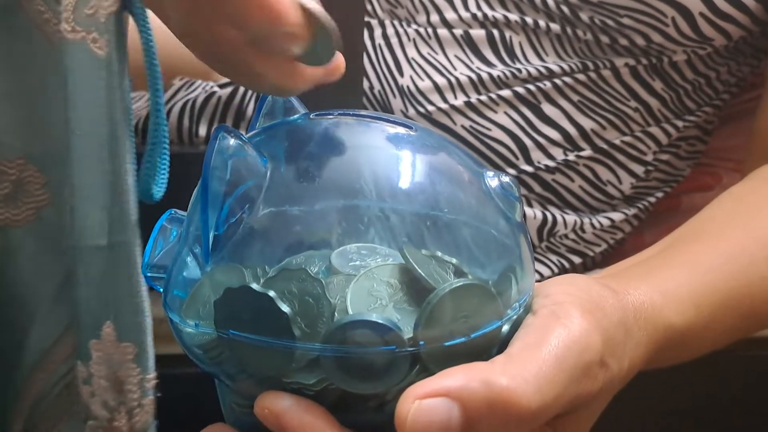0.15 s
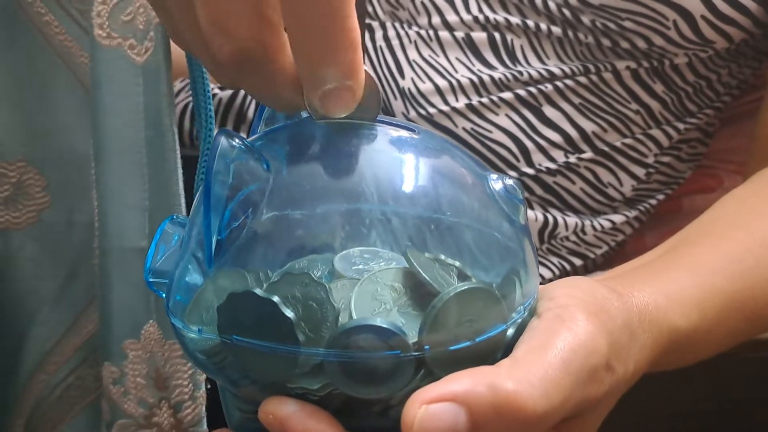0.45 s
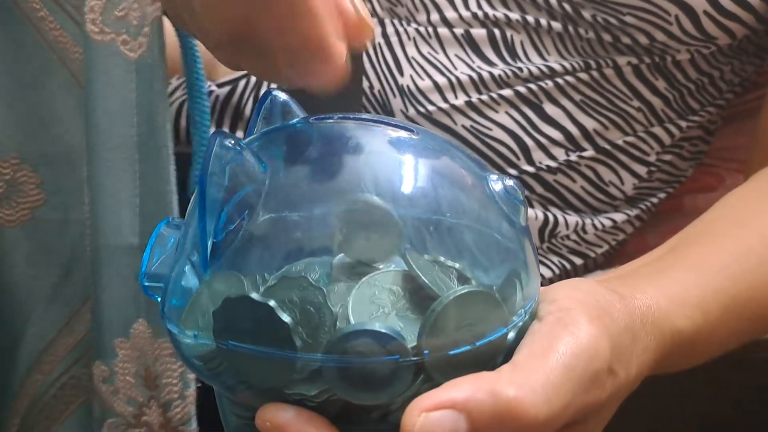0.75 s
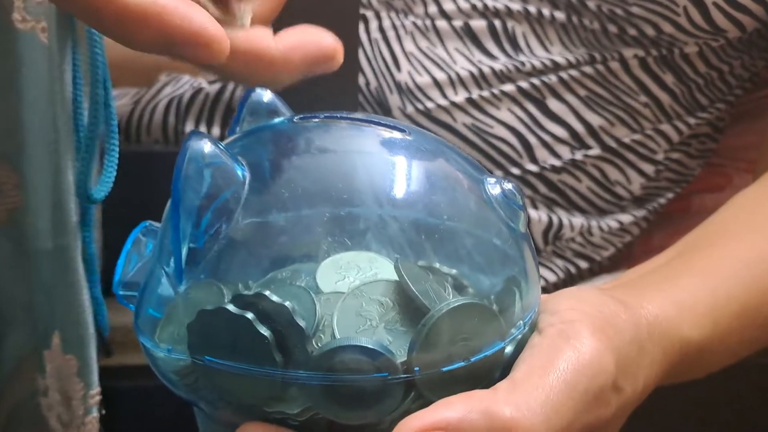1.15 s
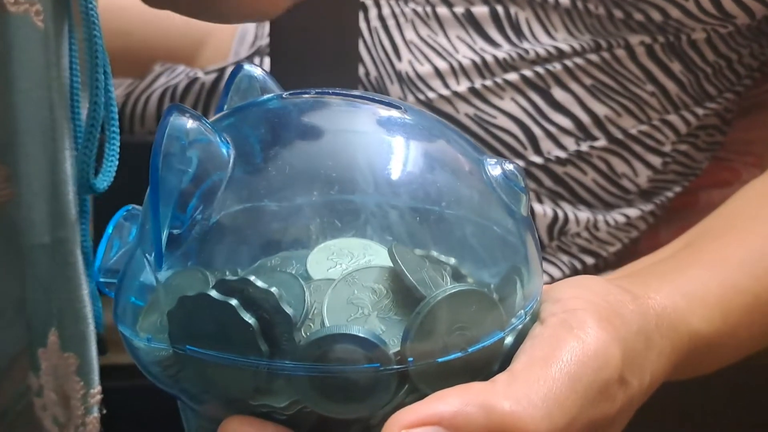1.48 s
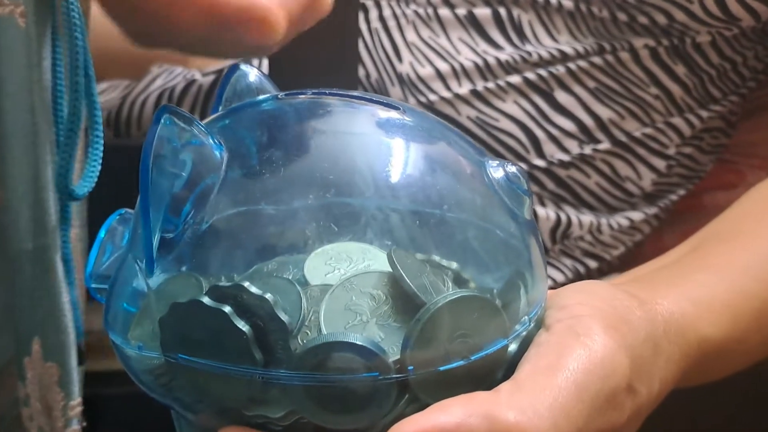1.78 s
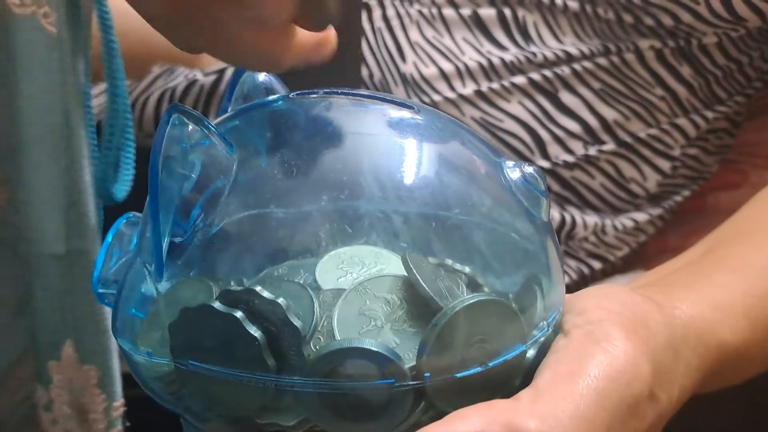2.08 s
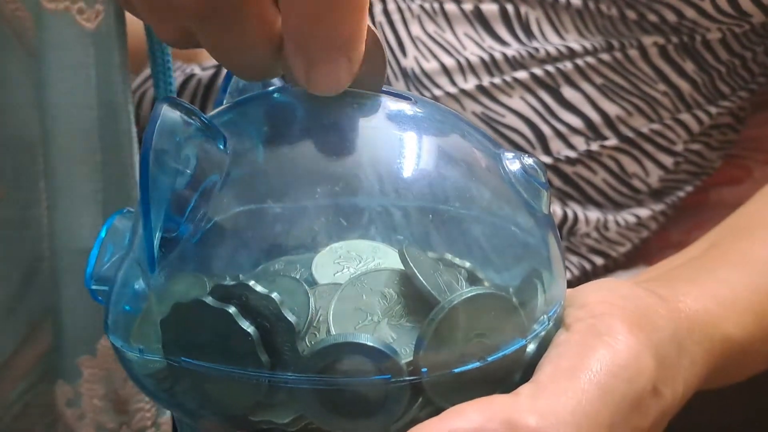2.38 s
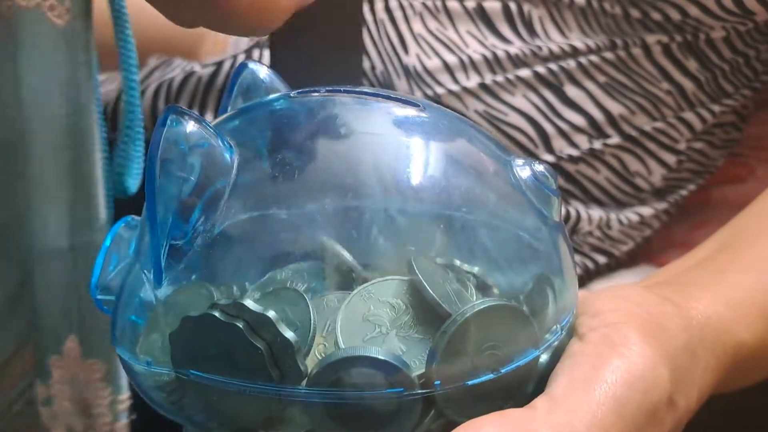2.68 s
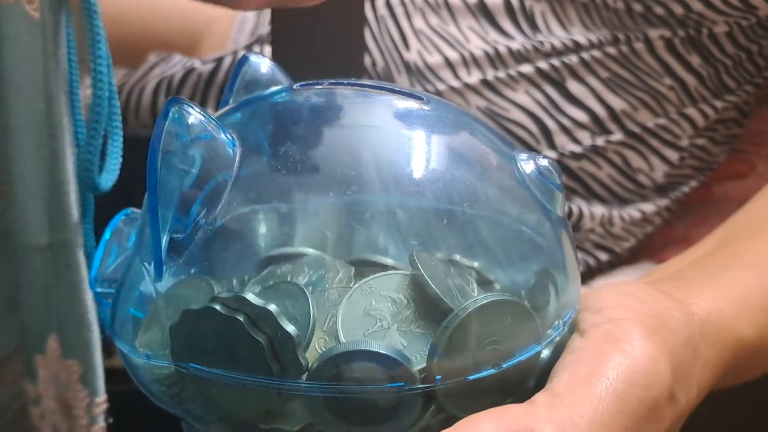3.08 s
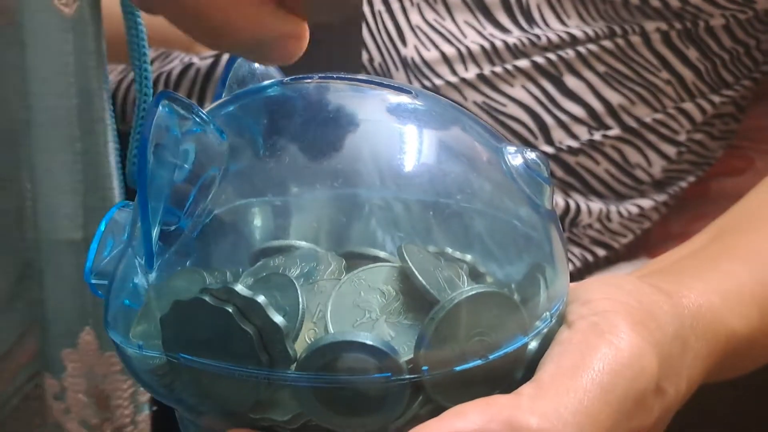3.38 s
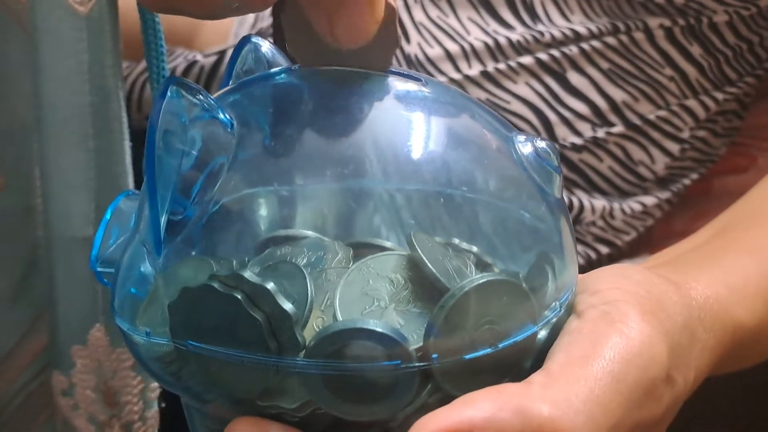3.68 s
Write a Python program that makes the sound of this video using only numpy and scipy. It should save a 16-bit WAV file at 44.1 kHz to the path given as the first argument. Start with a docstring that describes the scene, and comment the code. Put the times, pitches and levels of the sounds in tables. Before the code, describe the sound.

Close up in a small quiet room, a coin lands sharply on loose coins in a plastic container, fingers shuffle more coins with light clinks, then another knocks the slot and rattles down; the left side is brighter.

```python
"""In a quiet room with a low hum, coins are fed through the slot of a hollow plastic bank held in the hands.
Each coin scrapes the slot, lands on the pile, bounces and slides; between drops coins clink in the fingers.
Blows and rubs are random touches that excite ringing modes; free coins add single dying tones.
The left microphone port faces the coins; the right one is shadowed and hears them duller.
Feedback delays make the room, shaped noise makes its air, wavering hum and low rumble."""
import sys
import numpy as np
from scipy import signal
from scipy.fft import rfft, irfft, next_fast_len
from scipy.io import wavfile

SR = 44100
rng = np.random.default_rng(int(sys.argv[2]) if len(sys.argv) > 2 else 0)


def materialize(psi):
    """Save the field psi as 16-bit PCM at rate SR to the path in sys.argv[1].

    A 1-D psi becomes a single channel; in a 2-D psi each row is a channel.
    """
    bounded = np.clip(np.atleast_2d(psi).T, -1, 1)
    quanta = np.round(bounded * 32767).astype(np.int16)
    wavfile.write(sys.argv[1], SR, quanta)


def volts_from_decibels(level):
    """Turn decibel levels (scalar or array-like) into linear amplitude factors."""
    exponent = np.asarray(level, float) / 20
    return 10 ** exponent


N = 169785  # samples

# modes of the plastic shell, the coins in the pile, the slot edge and the coin rims: [f/Hz, level/dB]
SHELL_MODES = [(300, -10), (420, -7), (560, 0.5), (700, 7.5), (870, -2), (1100, 1), (1300, 9), (1600, -3.5)]
PILE_MODES = [(1900, -11.5), (2150, -3.5), (2430, 2), (2700, -5.5), (3000, 2), (3310, 3), (3750, -5.5),
              (4200, -4), (4700, 3), (5200, 4.5), (5800, 4), (6400, 3.5), (7000, -0.5)]
EDGE_MODES = [(2300, -20.5), (2600, 0.5), (3310, 1), (4300, -23), (5200, -7), (5900, -25.5)]
RIM_MODES = [(7700, -4), (8500, 0), (9300, 2.5), (10100, 1), (10900, 0.5), (11700, 0.5), (12500, -1.5),
             (13400, -2.5), (14400, -3), (15300, -0.5)]
# each body: modes, cycles of ringing until 60 dB down, likeness of the two ports (1 = same)
SHELL_BODY = (SHELL_MODES, 8, 0.82)
PILE_BODY = (PILE_MODES, 18, 0.54)
EDGE_BODY = (EDGE_MODES, 55, 0.54)
RIM_BODY = (RIM_MODES, 13, 0.54)
# a coin strikes the pile, shell and rim levels relative to the blow, chatter to its contact:
# [t/s, level/dB, favoured f/Hz, shell level/dB, rim level/dB, chatter level/dB, chatter t60/s]
PILE_STRIKES = [(0.8226, -17.5, 3360, -17, -8, -10, 0.15), (0.8807, -21.5, 2720, -7.5, -12, -17, 0.14),
                (0.9133, -13.5, 3440, -22.5, -17, -1, 0.035), (0.9206, -38, 2610, -18, -21.5, -17.5, 0.088),
                (0.9738, -22, 3250, -28, -14, -18, 0.11), (1.0305, -31, 5130, -15, -7, -16, 0.088),
                (1.065, -31, 3480, -43, 1, 2, 0.086), (1.1438, -24, 3800, -16.5, -18, -9, 0.15),
                (2.6733, -17, 3480, -19.5, -10, 1, 0.14), (2.7018, -16.5, 5330, -14.5, -14, -5, 0.11),
                (2.7412, -14, 3500, -30.5, -7.5, -10.5, 0.046), (2.7589, -28, 3320, -26, -10.5, -15.5, 0.1),
                (2.7794, -24, 3280, -19, -9, -14, 0.11), (2.7951, -5.5, 2300, -19, -18.5, -17.5, 0.07),
                (2.8616, -30, 3790, -17, -8, -10, 0.14), (2.8789, -22.5, 3200, -17.5, -13, -14.5, 0.072),
                (2.8924, -32, 3360, -22, -23, -17.5, 0.068), (2.917, -43, 3710, 1.5, -0.5, -30, 0.15),
                (2.9435, -22, 3070, -13, -9.5, -8.5, 0.072), (2.9481, -24.5, 3540, -22, -12, -3, 0.21),
                (2.9713, -18.5, 3290, -13.5, -6, -35, 0.1), (3.054, -24.5, 4340, -8.5, -39, -23, 0.15),
                (3.0769, -15, 2800, -21.5, -15.5, -23.5, 0.1), (3.0916, -29.5, 3370, -5, -7, -18, 0.1),
                (3.1142, -22, 4500, -26.5, -44, -16.5, 0.073)]


def coin_drops():
    """A falling coin excites pile, shell, slot edge and rims, then chatters as it settles."""
    s, db, pitch_hz, thud_db, treble_db, chatter_db, chatter_t60 = np.transpose(PILE_STRIKES)
    parts = [(SHELL_BODY, db + thud_db - 5.0), (PILE_BODY, db - 7),
             (EDGE_BODY, db - 24.5), (RIM_BODY, db + treble_db + 0.5)]
    return blows(s, pitch_hz, parts, chatter_db, chatter_t60, contact_s=0.0021)


# strokes of coins sliding over the pile, before the layer trim: [t/s, level/dB]
PILE_STROKES = [
    [(0.825, -31), (0.847, -47.5), (0.873, -58), (0.876, -46)],
    [(0.885, -27.5), (0.893, -41), (0.903, -43), (0.913, -33), (0.951, -53.5), (0.968, -58)],
    [(0.98, -45), (1.018, -63), (1.032, -48.5), (1.048, -54), (1.06, -47)],
    [(1.07, -48), (1.074, -48.5), (1.124, -41), (1.136, -47), (1.144, -35.5), (1.192, -67), (1.2, -61)],
    [(2.674, -35), (2.698, -34.5), (2.704, -29.5), (2.73, -33.5), (2.738, -35.5)],
    [(2.746, -32), (2.776, -40.5), (2.79, -36), (2.792, -27.5)],
    [(2.802, -27.5), (2.804, -31.5), (2.846, -51), (2.896, -41.5), (2.908, -47), (2.94, -42.5)],
    [(2.955, -47), (2.965, -39), (2.975, -30), (2.985, -43), (3.039, -45.5), (3.071, -54), (3.074, -35)],
    [(3.082, -33), (3.106, -41), (3.116, -37), (3.126, -56), (3.164, -76), (3.19, -60)],
]


def pile_slides():
    """A coin sliding over others makes dense small touches, mostly into the coin modes."""
    parts = [(SHELL_BODY, -16), (PILE_BODY, 0), (EDGE_BODY, -14), (RIM_BODY, -3)]
    return volts_from_decibels(-3.5) * rub(PILE_STROKES, parts)


# a free coin rings until stopped: [t/s, f/Hz, level/dB, t60/s, ringing time/s]
FREE_COINS = [(.881, 13230, -33, .3, .034), (.881, 13410, -41, .25, .14), (1.031, 13400, -39, .25, .075),
              (1.065, 8620, -45, .3, .077), (2.702, 9500, -43, .15, .04), (2.705, 6970, -44, .1, .025),
              (2.797, 9453, -42, .35, .065), (2.797, 9552, -42, .45, .22), (2.742, 3305, -36, .12, .033),
              (2.17, 8600, -54, .2, .09)]


def free_coin_rings():
    """Free coins keep single tones after the blow until the next touch stops them."""
    t = np.arange(N) / SR
    out = np.zeros((2, N))
    for s, hz, db, t60, length_s in FREE_COINS:
        stopped = np.clip((s + length_s - t) / 0.0055, 0, 1)  # fades over the last 5.5 ms
        decay = volts_from_decibels(db - 60 * np.maximum(t - s, 0) / t60)
        tone = np.sin(2 * np.pi * (hz * t + rng.random((2, 1))))  # own phase at each port
        out += (t > s) * stopped * decay * tone
    return out


# a coin touches the slot, shell and rim levels relative to the blow, chatter to its contact:
# [t/s, level/dB, favoured f/Hz, shell level/dB, rim level/dB, chatter level/dB, chatter t60/s]
SLOT_TOUCHES = [(0.4234, -51.5, 2480, -23, -12, 12, 0.26), (0.4474, -49, 3330, -6, -8, -18, 0.27),
                (0.525, -59, 2570, -11, -17, -7, 0.11), (0.648, -50, 2620, -22, -35.5, 4.5, 0.1),
                (0.7627, -46, 3320, -5.5, -28, -13.5, 0.15), (2.375, -53.5, 2610, -3, -50, -16, 0.1),
                (2.4421, -57, 2320, 2.5, -39, 0, 0.084), (2.5217, -29.5, 2580, -16, -50.5, -6.5, 0.074),
                (2.5385, -38, 2590, -13.5, -40, -12.5, 0.13), (2.5505, -35.5, 3330, -9, -60.5, -3.5, 0.1),
                (2.5906, -37, 2420, -9.5, -18.5, -7, 0.069), (2.6135, -30.5, 3290, -14, -27.5, -14.5, 0.25),
                (2.6283, -22.5, 3190, -23, -29.5, -13, 0.075), (3.8042, -58, 3350, -0.5, -20.5, -3, 0.25)]


def slot_touches():
    """A coin knocking the slot excites mainly its long-ringing edge and the shell."""
    s, db, pitch_hz, thud_db, treble_db, chatter_db, chatter_t60 = np.transpose(SLOT_TOUCHES)
    parts = [(SHELL_BODY, db + thud_db - 3), (EDGE_BODY, db - 4.5),
             (PILE_BODY, db - 17.5), (RIM_BODY, db + treble_db - 11.5)]
    return blows(s, pitch_hz, parts, chatter_db, chatter_t60, contact_s=0.0019)


# strokes of a coin sliding along the slot, before the layer trim: [t/s, level/dB]
SLOT_STROKES = [
    [(0.41, -83), (0.448, -63), (0.47, -72), (0.638, -91), (0.648, -66), (0.74, -88), (0.764, -56.5),
     (0.8, -79)],
    [(2.36, -93), (2.372, -74), (2.514, -87.5), (2.518, -57.5), (2.522, -46.5), (2.622, -62.5),
     (2.63, -35.5), (2.665, -64.5)],
]


def slot_scrapes():
    """A coin scraping through the slot makes dense touches, mostly into its edge."""
    parts = [(SHELL_BODY, -14), (EDGE_BODY, 0), (PILE_BODY, -12), (RIM_BODY, -22)]
    return volts_from_decibels(-3.5) * rub(SLOT_STROKES, parts)


def bank():
    """Everything that sounds through the plastic shell, with nothing below about 290 Hz."""
    sound = coin_drops() + slot_touches() + pile_slides() + free_coin_rings() + slot_scrapes()
    return signal.sosfilt(signal.butter(3, 290, "high", fs=SR, output="sos"), sound)


# modes of coins held in the hand: [f/Hz, level/dB]
HELD_MODES = [(2900, -16.5), (3300, -3.5), (3800, 0.5), (4300, 1), (4800, -1), (5300, -1), (6000, -4.5),
              (6800, -2.5)]
HELD_BODY = (HELD_MODES, 18, 0.54)
# coins clink in the fingers, rim level relative to the blow, chatter to its contact:
# [t/s, level/dB, favoured f/Hz, rim level/dB, chatter level/dB, chatter t60/s]
FINGER_CLINKS = [(0.0374, -70, 5000, 4, -6, 0.1), (0.132, -34, 5100, -7, -20.5, 0.13),
                 (0.2054, -51.5, 4470, -7, 4, 0.13), (0.2887, -64, 3210, -14, -8, 0.1),
                 (1.1006, -29.5, 4740, -12.5, -6.5, 0.15), (1.1234, -33.5, 3870, -23, -14, 0.18),
                 (1.2156, -28.5, 5360, -12, 16, 0.086), (1.2441, -30, 5060, -7, 3, 0.042),
                 (1.2755, -55, 5010, -1, -13, 0.1), (1.3021, -41, 5400, -6, -5, 0.08),
                 (1.4035, -47, 4370, -12, -10, 0.1), (1.4486, -32, 4110, -12, -16, 0.12),
                 (1.4554, -41.5, 4100, 1, -17, 0.1), (1.47, -29, 3700, -8, -5.5, 0.047),
                 (1.5115, -45.5, 4370, -4.5, -7, 0.084), (1.561, -49.5, 4460, 1, -10, 0.2),
                 (1.6056, -45, 3470, -3, -32, 0.13), (1.6108, -35.5, 4800, -5, 12, 0.12),
                 (1.6641, -49, 3330, -12, -19, 0.1), (1.7404, -52, 3100, -3, -7.5, 0.26),
                 (1.9124, -52.5, 3800, -5, -9, 0.15), (1.933, -47.5, 4000, -11.5, -12, 0.044),
                 (1.9538, -43.5, 3900, -9, -15, 0.16), (2.0566, -51.5, 3900, -9.5, 4, 0.3),
                 (2.0839, -32.5, 4270, -8.5, 8, 0.058), (2.135, -29, 3850, -1, -29, 0.24),
                 (2.1679, -38, 3340, -4.5, 10.5, 0.13), (3.1988, -30, 3960, -12, -2.5, 0.071)]


def finger_clinks():
    """Held coins knock together: shorter contacts into coin and rim modes, without the shell."""
    s, db, pitch_hz, treble_db, chatter_db, chatter_t60 = np.transpose(FINGER_CLINKS)
    parts = [(HELD_BODY, db - 6), (RIM_BODY, db + treble_db - 1.0)]
    return blows(s, pitch_hz, parts, chatter_db, chatter_t60, contact_s=0.00085)


# strokes of coins rubbing over each other in the hand, before the layer trim: [t/s, level/dB]
FINGER_STROKES = [
    [(0.0, -56), (0.01, -68.5), (0.032, -82), (0.04, -77), (0.066, -75.5), (0.11, -79)],
    [(0.12, -62), (0.132, -53.5), (0.148, -68), (0.19, -72), (0.212, -56), (0.246, -75), (0.38, -99)],
    [(1.07, -43), (1.082, -44.5), (1.104, -43), (1.11, -60), (1.122, -57), (1.136, -62), (1.14, -56)],
    [(1.19, -62), (1.2, -57), (1.22, -41), (1.244, -36.5), (1.292, -92), (1.298, -59), (1.39, -67)],
    [(1.39, -89), (1.404, -72), (1.432, -59.5), (1.446, -48), (1.476, -51), (1.492, -77), (1.55, -67)],
    [(1.55, -64), (1.564, -53), (1.596, -54.5), (1.612, -49.5), (1.694, -71), (1.752, -64.5), (1.8, -89)],
    [(1.89, -86), (1.91, -61.5), (1.936, -55), (1.948, -75), (1.954, -77), (1.972, -82), (2.04, -81)],
    [(2.05, -72), (2.058, -67), (2.07, -66), (2.084, -41), (2.11, -76), (2.13, -36)],
    [(2.14, -44), (2.144, -48), (2.174, -46), (2.222, -92), (2.27, -99.5)],
]


def finger_rubs():
    """Coins rubbing in the hand make dense touches into held-coin and rim modes."""
    return volts_from_decibels(-1.0) * rub(FINGER_STROKES, [(HELD_BODY, 0), (RIM_BODY, -3)])


def fingers():
    """Coins shifted in the hand above the slot, with nothing below about 2.7 kHz, a little softer on the right."""
    sound = (finger_clinks() + finger_rubs()) * volts_from_decibels([[0], [-2.0]])
    return signal.sosfilt(signal.butter(3, 2740, "high", fs=SR, output="sos"), sound)


BLOW_SIZE = 16384  # samples


def blows(s, pitch_hz, parts, chatter_db, chatter_t60, contact_s):
    """A short contact, then a dying chatter of small touches, into each (body, dB) part."""
    t = np.arange(BLOW_SIZE // 2) / SR
    touches = grains((len(s), len(t)), per_s=6000)
    t60 = np.clip(chatter_t60, .01, .4)[:, None]
    chatter = volts_from_decibels(chatter_db[:, None] - 60 * t / t60)
    force = touches * (np.exp(-t / contact_s) + chatter)
    force[:, 0] += 5.0  # the first hit
    spectra = rfft(force, BLOW_SIZE)
    sound = sum(volts_from_decibels(db)[:, None] * body(*thing, spectra, pitch_hz) for thing, db in parts)
    out = np.zeros((2, N + BLOW_SIZE))
    for k, start in enumerate((s * SR).astype(int)):
        out[:, start:start + BLOW_SIZE] += sound[:, k]
    return out[:, :N]


def body(modes, cycles, likeness, force, pitch_hz):
    """Each blow (a row of force spectra) favours modes near its pitch, a little differently at each port."""
    spread_pitch, spread_db = .02, 1.5  # pitch as a fraction
    favour_db, favour_octaves = 8.5, .3
    alike = np.clip(likeness, 0, 1)
    luck = rng.standard_normal((len(force), len(modes), 4))
    out = 0
    for k, (hz, db) in enumerate(modes):
        response = mode(hz * (1 + spread_pitch * luck[:, k, :1]), cycles / hz, BLOW_SIZE)
        port = alike + (1 - alike) * luck[:, k, 2:].T * [[.5], [1]]  # the right port varies more
        near_db = favour_db * np.exp(-(np.log2(hz / pitch_hz) / favour_octaves) ** 2)
        height = volts_from_decibels(db + near_db + spread_db * luck[:, k, 1]) * (-1) ** k
        out = out + (port * height)[:, :, None] * response
    sound = irfft(out * force, BLOW_SIZE)
    onset = sound[:1, :, :SR // 200]  # left port, first 5 ms, set to rms 1
    return sound / np.sqrt(np.mean(onset ** 2, axis=2, keepdims=True))


def rub(strokes, parts):
    """Dense touches, partly shared by the ports, drive all modes at the level of each stroke."""
    size, t = next_fast_len(N + SR // 4), np.arange(N) / SR
    level = sum(volts_from_decibels(np.interp(t, *np.transpose(rows), left=-200, right=-200)) for rows in strokes)
    shared, own = grains((N,), per_s=5000), grains((2, N), per_s=5000)
    response = 0
    for (modes, cycles, _), part_db in parts:
        for k, (hz, db) in enumerate(modes):
            response = response + volts_from_decibels(db + part_db) * mode(hz, cycles / hz, size) * (-1) ** k
    force = rfft((shared + own) * level, size)
    power = np.mean(np.abs(response) ** 2) * 2  # two sets of touches add up
    return irfft(force * response / np.sqrt(power), size)[:, :N]


def grains(shape, per_s):
    """Touches are random clicks of uneven size and sign; rms 1."""
    luck = rng.random(shape + (3,))
    clicks = luck[..., 0] < per_s / SR
    height = volts_from_decibels(-2.5 * np.log(luck[..., 1] + .01))
    return rms_one(clicks * height * np.sign(luck[..., 2] - .5))


def mode(hz, t60, size):
    """Frequency response of one ringing mode: a two-pole resonator whose impulse is a decaying sine."""
    z = np.exp(-2j * np.pi * np.arange(size // 2 + 1) / size)
    r, w = volts_from_decibels(-60 / (t60 * SR)), 2 * np.pi * np.minimum(hz, 17000) / SR
    return np.sin(w) * z / (1 - 2 * r * np.cos(w) * z + r * r * z * z)


def rms_one(x):
    """Scales a signal to rms 1."""
    return x / np.sqrt(np.mean(x ** 2) + 1e-20)


def at_hz(points, hz):
    """Reads a table on a log-frequency axis."""
    f, value = np.transpose(points)
    return np.interp(np.log(hz + 1e-9), np.log(f), value)


PORT_LAG_S = 0.0002  # right port behind left
# shadow over the right port: [f/Hz, level/dB]
RIGHT_SHADOW = [(300, -5.5), (1200, 0), (2400, -9.5), (4400, -4.5), (6500, -14.5), (8100, -20),
                (15000, -24)]


def space(x):
    """Eight feedback delays a side for the room, then the shadow and lag between the ports."""
    room_t60_s, room_db, room_cut_hz = 0.17, -16.5, 60000
    size = next_fast_len(N + SR)
    hz = np.arange(size // 2 + 1) * SR / size
    lags = rng.uniform(.006, 0.019, (2, 8, 1))  # s
    loop = volts_from_decibels(-60 * lags / room_t60_s) * np.exp(-2j * np.pi * hz * lags) / (1 + 1j * hz / room_cut_hz)
    echoes = loop / (1 - loop) * (-1) ** np.arange(8)[:, None]
    wet = echoes.sum(axis=1) * volts_from_decibels(room_db)
    right = np.exp(-2j * np.pi * hz * PORT_LAG_S) * volts_from_decibels(at_hz(RIGHT_SHADOW, hz))
    ports = np.array([np.ones(len(hz)), right])
    return irfft(rfft(x, size) * (1 + wet) * ports, size)[:, :N]


# colour of the room air, relative: [f/Hz, level/dB per Hz]
AIR_COLOUR = [(25, -27.5), (42, -5), (69, -18.5), (82, -2), (103, -5), (164, -11), (196, -13.5), (221, -23),
              (346, -17.5), (382, -21), (528, -26), (747, -29), (805, -32), (1110, -30), (2460, -45),
              (3650, -47), (5860, -61), (11200, -51.5), (15800, -62)]
# likeness of left and right air, negative values count as 0: [f/Hz, likeness]
AIR_LIKENESS = [(60, 0.94), (180, 0.92), (550, 0.77), (1650, -1.3), (4970, -0.03), (15000, -0.05)]
# left air over right: [f/Hz, level/dB]
AIR_BALANCE = [(60, 1), (110, 1), (200, -2.5), (380, 6), (700, -7), (1290, 2.5), (2380, -0.5), (4400, 3),
               (8120, 2.5), (15000, -7)]


def room_air():
    """Steady stereo noise: shared and opposed parts set how alike the ports are at each frequency."""
    hz = np.arange(N // 2 + 1) * SR / N
    mid, side = rfft(rng.standard_normal((2, N)))
    alike = np.clip(at_hz(AIR_LIKENESS, hz), 0, 1)
    lean = volts_from_decibels(at_hz(AIR_BALANCE, hz) * [[.5], [-.5]])
    lag = np.array([np.ones(len(hz)), np.exp(-2j * np.pi * hz * PORT_LAG_S)])
    stereo = np.sqrt(1 + alike) * mid + np.sqrt(1 - alike) * side * [[1], [-1]]
    return volts_from_decibels(-54) * rms_one(irfft(volts_from_decibels(at_hz(AIR_COLOUR, hz)) * lean * lag * stereo, N))


# wavering hum lines: [f/Hz, width/Hz, level/dB]
HUM_LINES = [(97.5, 6.9, -64.5), (309.9, 3.3, -75), (370.2, 24, -72), (758, 3.3, -76)]


def hum():
    """Narrow bands of noise, the same at both ports, are heard as wavering hum lines."""
    hz = np.arange(N // 2 + 1) * SR / N
    noise = rfft(rng.standard_normal(N))
    out = np.zeros(N)
    for f, width_hz, db in HUM_LINES:
        out += volts_from_decibels(db) * rms_one(irfft(noise / (1 + (2 * (hz - f) / width_hz) ** 2), N))
    return out


# course of the low rumble: [t/s, level/dB]
RUMBLE_LEVEL = [(0.0, -50.5), (0.96, -49.5), (1.34, -59), (1.85, -51.5), (2.23, -74), (2.59, -56),
                (3.4, -86), (3.43, -70), (3.83, -67), (3.85, -75)]


def low_rumble():
    """Noise in a narrow band, its own swells slightly evened out, follows a level curve."""
    centre_hz, width_hz, steadiness = 48, 7, 0.2
    hz = np.arange(N // 2 + 1) * SR / N
    noise = rfft(rng.standard_normal(N))
    band = signal.hilbert(irfft(noise / (1 + (2 * (hz - centre_hz) / width_hz) ** 4), N))
    steadied = rms_one((band / np.abs(band) ** steadiness).real)
    return steadied * volts_from_decibels(np.interp(np.arange(N) / SR, *np.transpose(RUMBLE_LEVEL)))


def scene():
    """Bank and fingers in the room, over its air, hum and rumble."""
    return space(bank() + fingers()) + room_air() + hum() + low_rumble()


def low_pass(x):
    """Removes everything above the highest recorded frequency."""
    return signal.sosfilt(signal.butter(12, 16890, fs=SR, output="sos"), x)


def record(dry):
    """A steep low-pass cuts the top of the finished mix."""
    top_cut = signal.cheby2(18, 30, 16150, fs=SR, output="sos")  # 30 dB down from 16150 Hz
    mix = signal.sosfilt(top_cut, dry)
    return low_pass(mix)


dry = scene()
out = record(dry)
materialize(out)
```